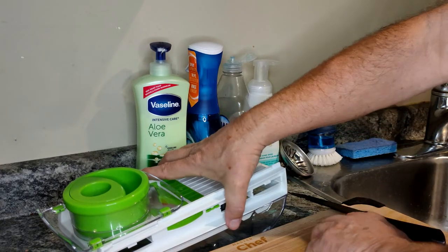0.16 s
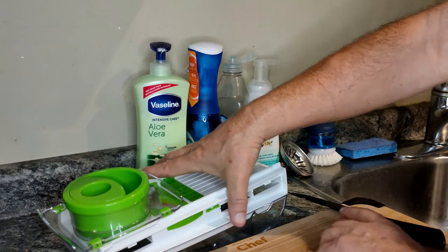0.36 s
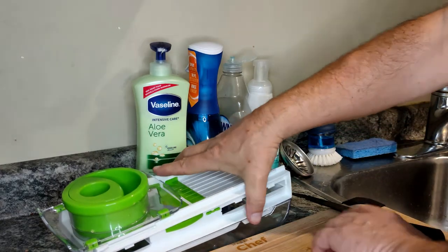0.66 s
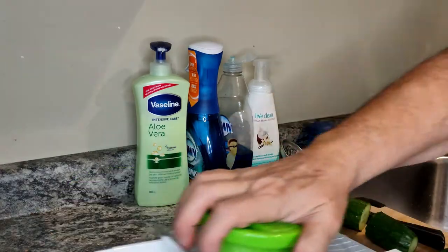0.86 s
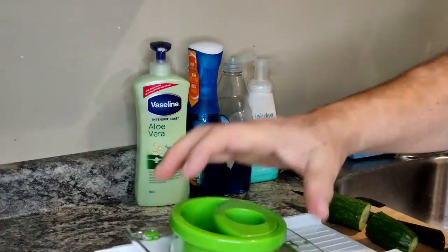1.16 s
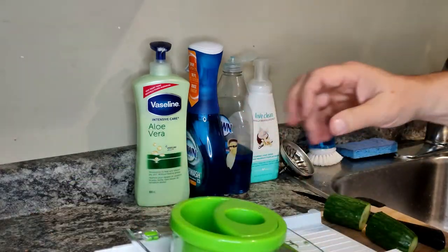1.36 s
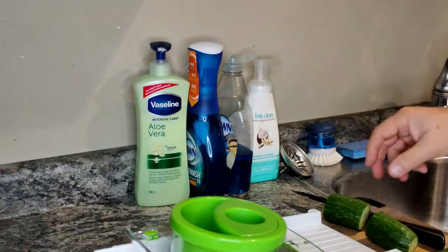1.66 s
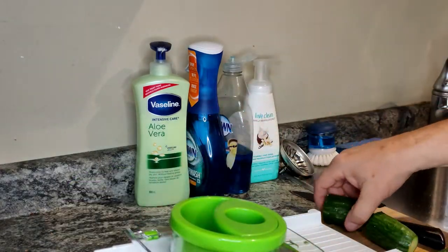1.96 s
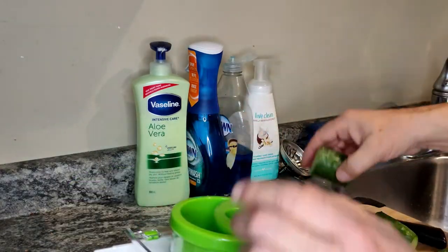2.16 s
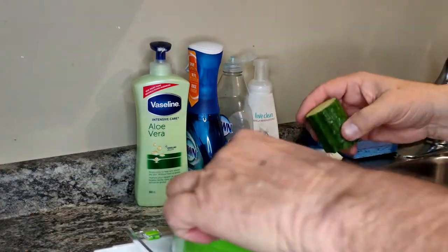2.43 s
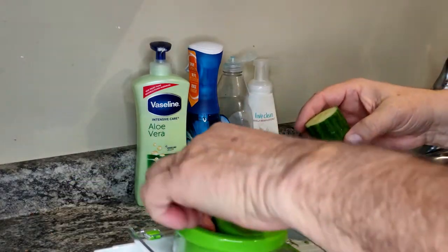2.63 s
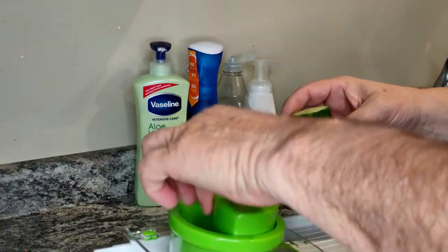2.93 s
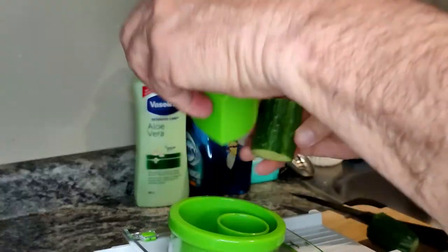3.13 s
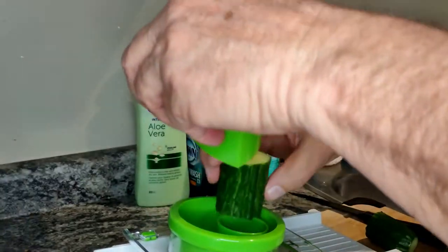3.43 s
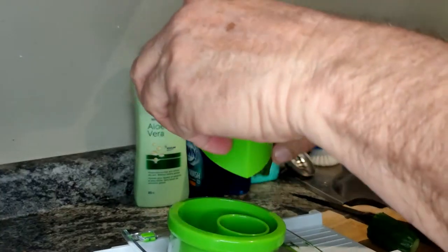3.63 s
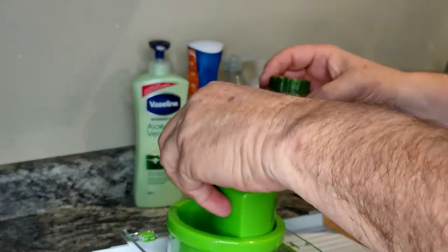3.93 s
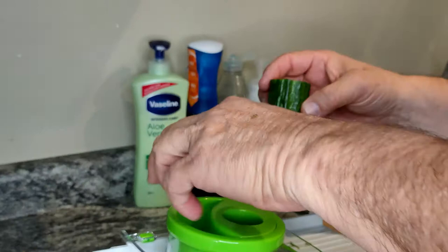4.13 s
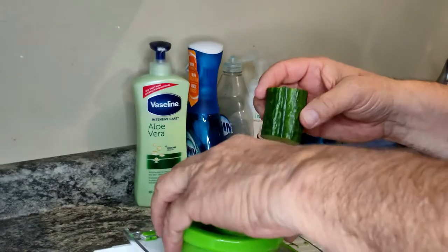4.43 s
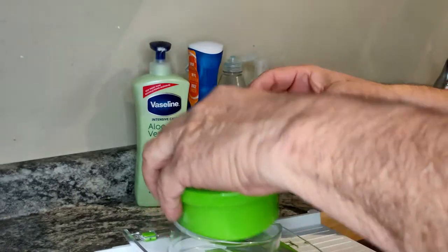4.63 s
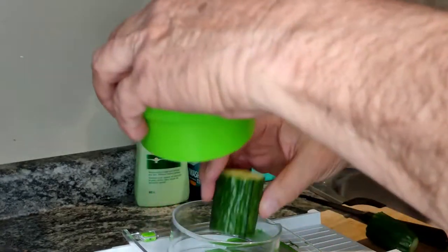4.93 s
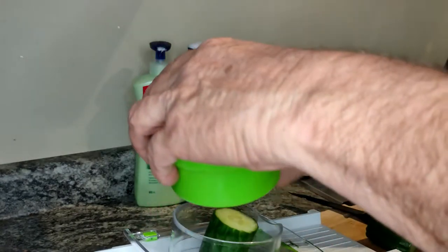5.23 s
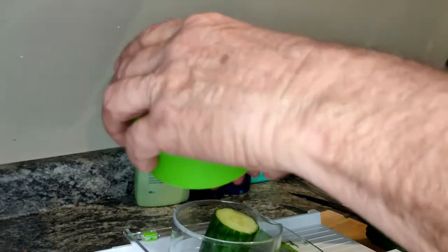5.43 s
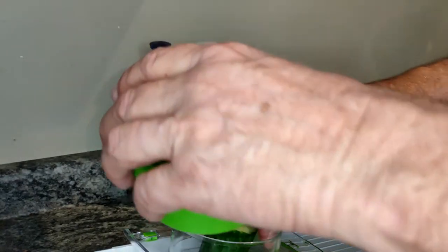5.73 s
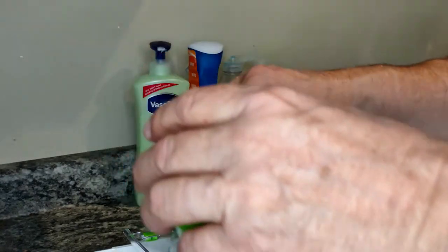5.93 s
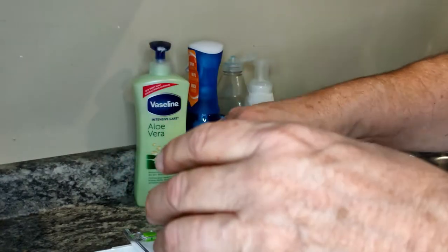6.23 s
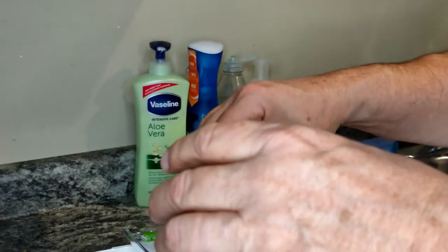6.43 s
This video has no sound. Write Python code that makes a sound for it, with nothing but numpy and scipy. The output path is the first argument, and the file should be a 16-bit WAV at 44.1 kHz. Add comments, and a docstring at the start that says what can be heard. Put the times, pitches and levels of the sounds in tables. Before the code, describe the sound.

A refrigerator hums low and steady in a small kitchen, with faint thin whines and room air. In the first half second, light plastic ticks and a soft slide are heard. From 0.7 to 1.3 seconds a hard plastic slicer is put down on a stone counter: loud hollow clacks, a very sharp crack near 1.0, dull low thuds, gritty scraping and loose rattling. Smaller hollow taps come at 1.6 to 1.95, then quiet handling and soft rubbing until 3. A bright clack hits at about 3.1 and another at 3.45. From 4.0 to 4.3 there is a dense, loud clatter of hollow plastic, with scuffs and soft counter thuds, followed by lighter knocks to 4.75. After 5.2 only airy slides and barely audible taps remain over the hum. The microphone is near, the top end dull, and brief echoes follow the blows.

```python
"""A refrigerator hums in a home kitchen under a faint slide; then hollow clacks, rattles and soft slides follow.
Hands set a plastic vegetable slicer on a stone counter, take up a cucumber and fit the holder and pusher.
Knocks and thuds are noisy pushes that ring plastic and counter modes; slides are grainy friction noise,
with loose parts that rattle. The hum is a stack of compressor orders with whines and room air.
Sparse echoes follow the blows; a near, narrow-band microphone hears everything."""
import sys
import numpy as np
from scipy import signal
from scipy.fft import rfft, irfft
from scipy.io import wavfile
from scipy.ndimage import uniform_filter1d

SR = 44100
rng = np.random.default_rng(int(sys.argv[2]) if len(sys.argv) > 2 else 0)


def wrap_up_sound(samples):
    """Save the sound to the file named by the first command line argument, as 16-bit audio."""
    columns = np.atleast_2d(samples).T
    # keep every value between -1 and 1, then stretch to whole-number steps
    tamed = np.clip(columns, -1, 1)
    steps = np.round(tamed * 32767).astype(np.int16)
    wavfile.write(sys.argv[1], SR, steps)


def convert_level_to_amplitude(level_db):
    """Map a level in decibels to its linear amplitude factor."""
    exponent = np.asarray(level_db, float) / 20
    return 10 ** exponent


N = 290178  # samples

# Levels in these tables are source levels, ahead of the microphone.
# compressor orders: multiple of the shaft rate, level_db (added to MOTOR_DB)
MOTOR_ORDERS = [(4, -16), (5, -3.5), (6, -2), (7, -8), (8, -15.5), (9, -22), (10, -25.5)]
# thin refrigerator whines: pitch_hz, level_db (rms, before slow wander)
FRIDGE_WHINES = [(215, -68), (947, -75), (2186, -78.5), (3074, -78), (4199, -68.5)]
# spectrum shape of the room air: frequency_hz, density_db (per Hz, relative)
AIR_COLOUR = [(30, -15), (150, -3.5), (220, -1.5), (450, 4), (1000, -7), (1300, -11), (2800, -16.5),
              (5000, -9.5), (6500, -3.5), (8000, -20.5)]
# spectrum shape of the handling rumble: frequency_hz, density_db (per Hz, relative)
HANDLING_COLOUR = [(20, -9.5), (45, -11), (90, -4), (160, -4.5), (300, -25.5)]
# strokes of skin and plastic: firmest_s, level_db, dullness_db (scuff over hiss), swell_s, fade_s
STROKES = [(0.0, -47, 6.5, .01, 0.11), (.104, -40, -10, 0.12, 0.12), (.14, -48.5, -11, .02, 0.73),
           (.54, -50, -18, 0.17, 0.98), (0.719, -49.5, 2.5, 0.18, 0.059), (0.831, -37, 5.5, .03, 0.21),
           (0.976, -30, -11.5, 0.083, 0.031), (1.012, -27.5, 3, .02, 0.084), (1.11, -36.5, -3, 0.063, .14),
           (1.28, -47, 2, 0.035, 0.19), (1.775, -48.5, 11.5, 0.085, 0.024), (1.85, -49.5, -1, .03, 0.37),
           (2.1, -41, -21, 0.12, .03), (2.171, -56, -5, .03, 0.27), (2.599, -52, 4, 0.063, 0.099),
           (2.79, -48, -7, 0.07, 1), (3.12, -41.5, 5.5, .03, 0.14), (3.43, -49.5, -35, 0.15, 0.031),
           (3.491, -44.5, 9.5, 0.028, 0.12), (3.66, -52, -12, 0.079, .55), (4.11, -38, -3.3, 0.033, 0.43),
           (4.29, -36.5, 4, 0.032, 0.14), (4.55, -52, 0, 0.22, 0.11), (4.7, -37, -18, 0.1, 0.24),
           (4.8, -45, -5.5, 0.017, 0.41), (5.15, -42.5, -8, .55, 0.21), (5.28, -53.5, -7, .1, 0.065),
           (5.58, -44.5, -18, 0.29, 0.39), (6.0, -57, -18, .1, 0.17), (6.267, -41.5, -14, 0.025, .04)]
# spectrum shape of the friction hiss: frequency_hz, density_db (per Hz, relative)
HISS_COLOUR = [(2000, -24.5), (3500, -15), (5000, -10.5), (6400, 3), (8000, -16.5)]
# curve that shapes the dull scuff after the slicer's modes: frequency_hz, density_db (per Hz, relative)
SCUFF_COLOUR = [(350, -17.5), (600, -12), (1300, -3.5), (2300, -0.5), (4000, -6), (6000, -26.5)]
# blows that reach the counter: start_s, level_db, favoured_pitch_hz, push_length_ms
COUNTER_BLOWS = [(0.239, -45.5, 91.5, 2.3), (0.329, -47.5, 108, 2.9), (0.601, -57, 91.5, 4.9),
                 (0.743, -27, 86.1, 4), (0.799, -30, 108, 6.6), (0.983, -30.5, 101, 6.2),
                 (1.029, -37.5, 161, 4.5), (1.206, -45, 105, 3.5), (1.256, -45.5, 86.1, 6.8),
                 (1.669, -45, 98, 6.6), (1.712, -44.5, 140.6, 3.5), (1.787, -46.5, 89.7, 4.3),
                 (2.049, -54, 80.2, 4.1), (2.112, -35.5, 118, 6.2), (2.599, -48, 151, 22),
                 (2.858, -48.5, 145, 8.5), (3.049, -38.5, 128.5, 32), (3.082, -47.5, 126.3, 4.1),
                 (3.458, -36.5, 143, 12), (4.039, -32, 122, 7.5), (4.107, -38.5, 137, 12),
                 (4.254, -36.5, 148, 13), (4.522, -45, 114, 2.1), (4.636, -44, 152, 13),
                 (4.745, -42, 132.8, 4.8), (5.169, -54.5, 152, 5.3), (5.348, -53.5, 124, 5)]
# modes of the stone counter: pitch_hz, level_db (relative)
COUNTER_MODES = [(66, -17), (92, -10.5), (115, -3.5), (141, 1), (165, 1.5), (200, -4), (240, 3.5)]
# blows on the plastic: start_s, tick_level_db, hollowness_db (low modes over the bright tick),
# favoured_pitch_hz, chatter_length_ms
PLASTIC_BLOWS = [(0.1101, -30, -11.5, 925, 5), (0.2014, -33, -19.5, 1440, 5.6),
                 (0.3304, -36.5, -3.5, 772, 2.9), (0.6035, -47, -1, 627, 3.1),
                 (0.7354, -20.5, -9, 1380, 11), (0.7417, -17.5, -9, 759, 8.1), (0.7868, -12, -4.5, 807, 11),
                 (0.7956, -8, -8, 1670, 1.9), (0.9286, -29, -2.5, 666, 7.8), (0.9823, -5.5, -22, 1814, 3.1),
                 (1.0154, -23, -14.5, 1087, 8.9), (1.0477, -30, 0, 1610, 2.7),
                 (1.1139, -26, -8.5, 1320, 4.2), (1.1762, -25, -12.5, 2390, 3.4),
                 (1.2058, -21.5, -9, 1890, 5.6), (1.2434, -26.5, -7.5, 1070, 3.7),
                 (1.2521, -17.5, -30.5, 581, 2.3), (1.6124, -50.5, 8, 1220, 5.9),
                 (1.6465, -32.5, -0.5, 1520, 3.1), (1.6688, -30.5, 2, 984, 2.2), (1.7064, -26, -1, 797, 4),
                 (1.722, -16, -14, 586, 2.3), (1.7841, -27.5, 0.5, 1520, 2.7), (1.8134, -28.5, 1, 590, 3.2),
                 (1.9296, -30.5, -29, 576, 2.1), (2.0413, -50, -3, 810, 7.1), (2.1084, -40, 17, 777, 5.9),
                 (2.1534, -61.5, 29.5, 725, 5.6), (2.2383, -54, -5, 675, 2.3), (2.3276, -53, -25, 703, 3.3),
                 (2.5865, -45.5, -1, 1620, 6.5), (2.6615, -34, -6, 1700, 9.8), (2.7985, -60, 18, 620, 2.7),
                 (2.861, -38, -4.5, 1180, 4.3), (3.0235, -38.5, -8, 1850, 13),
                 (3.0476, -18.5, -0.5, 579, 8), (3.0822, -8.5, -25.5, 1630, 2.9),
                 (3.1083, -27, 0.5, 573, 1.7), (3.4552, -13, -9, 2450, 5.8), (3.5119, -29.5, -9, 586, 5),
                 (4.0041, -14.5, -8.5, 2170, 5), (4.0297, -7.5, -10.5, 788, 4.2),
                 (4.0474, -14, -4.5, 1012, 5), (4.0755, -25.5, -13, 1874, 5), (4.1016, -21.5, -3, 774, 11),
                 (4.1719, -33, -14, 793, 6.1), (4.2162, -26, -8, 634, 14), (4.2497, -12, -10, 1777, 6.8),
                 (4.2615, -8.5, -10, 770, 3), (4.2894, -29.5, 0, 585, 3.9), (4.4468, -26, -37, 1490, 4.1),
                 (4.52, -24, -10, 2100, 2.2), (4.6209, -42, 0, 585, 5.4), (4.6364, -34.5, 4.5, 634, 3.9),
                 (4.6616, -34, 3, 622, 6.6), (4.7451, -23.5, -2.5, 591, 8.1),
                 (5.1651, -38.5, -14.5, 617, 5.3), (5.8876, -51.5, 5.5, 956, 4),
                 (5.9534, -52, 0.5, 604, 3.5), (6.5234, -59.5, 5, 530, 5.4)]
# modes of the plastic slicer: pitch_hz, level_db (relative)
SLICER_MODES = [(587, -1), (705, -2), (830, 0), (965, 0), (1060, 0.5), (1240, 2.5), (1440, 2), (1600, -1.5),
                (1730, -3.5), (1850, -1.5), (2090, 0), (2270, -1.5), (2540, 0.5), (2950, -1), (3240, 3),
                (3750, 3), (4100, -12), (4700, -7.5), (5300, -7), (5600, -7.5), (6200, 1), (6550, 3),
                (6950, 3), (7300, -17)]
# decay of the kitchen's echoes: frequency_hz, t60_s
KITCHEN_DECAY = [(100, 0.38), (300, 0.94), (700, 0.38), (2000, 0.42), (5000, 0.42), (8000, 0.36)]
# response of the narrow-band microphone: frequency_hz, gain_db
MICROPHONE_RESPONSE = [(20, -13.5), (60, 2), (5000, -8.5), (7000, -10.5), (7500, -5), (8000, -14),
                       (8400, -24.5), (8800, -76), (12000, -79.5)]

MOTOR_HZ, MOTOR_DB, AIR_DB = 59.2, -53.5, -55.5
# hands lean on the counter around every thud: level at a thud of -38 dB, share of its strength, swell, fade, floor
RUMBLE_DB, RUMBLE_SHARE, RUMBLE_SWELL_S, RUMBLE_FADE_S, RUMBLE_REST_DB = -55.5, 0.61, 0.25, 0.25, -71.5
STROKE_RANGE_DB = 20  # how far a contact rises in its swell time and falls in its fade time
CATCHES_PER_S = 590
RATTLES_PER_S, RATTLE_DB, RATTLE_SPREAD_DB = 70, -6.5, 7
RATTLE_LAW = 2.4  # rattle dB per stroke dB: only firm strokes shake parts loose
COUNTER_LOSS, PLASTIC_LOSS = 0.37, 0.05  # mode width over pitch, at the mean pitch of the modes struck
HOLLOW_TOP_HZ, CLACK_TOP_HZ, BODY_LOW_HZ = 1500, 4000, 480
CLACK_DB, CLACK_SHARE = -1.5, 0.4  # the middle modes take a share of the hollowness
FAVOUR_DB = 10  # lift of the plastic modes at the favoured pitch
KITCHEN_DB = -10.5


def evened(x):
    """Scales to rms 1."""
    return x / np.sqrt(np.mean(x ** 2) + 1e-20)


def read(points, hz):
    """Reads a curve on a log-frequency axis."""
    f, value = np.transpose(points)
    return np.interp(np.log(hz + 1), np.log(f + 1), value)


def coloured(x, points):
    """Multiplies the spectrum of x by the dB curve of points."""
    gain = convert_level_to_amplitude(read(points, np.fft.rfftfreq(len(x), 1 / SR)))
    return irfft(rfft(x) * gain, len(x))


def wander(rate_hz):
    """Slow random drift of rms 1: noise through a one-pole lowpass."""
    pole = np.exp(-2 * np.pi * rate_hz / SR)
    return evened(signal.lfilter([1], [1, -pole], rng.standard_normal(N)))


def tents(s, db, swell_s, fade_s):
    """Sums the power of contacts that swell up to their moment and fade after it, straight in dB."""
    t = np.arange(0, N + 64, 64)[:, None] / SR - s
    distance = np.maximum(-t / np.maximum(swell_s, .005), t / np.maximum(fade_s, .005))
    power = convert_level_to_amplitude(2 * (db - STROKE_RANGE_DB * distance)).sum(1)
    return np.interp(np.arange(N), np.arange(len(t)) * 64, np.sqrt(power))


def ring(push, modes, loss, lift_db):
    """A push sounds damped modes, the lowest relatively narrower; the loudest 10 ms have rms 1."""
    hz, db = np.transpose(modes)[:, :, None]
    t = np.arange(len(push)) / SR
    loss = loss * (hz / hz.mean()) ** .4
    sign = (-1) ** np.arange(len(modes))[:, None]  # neighbours in opposite phase
    strength = sign * convert_level_to_amplitude(db + lift_db[:, None])
    body = (strength * np.exp(-np.pi * loss * hz * t) * np.sin(2 * np.pi * hz * t)).sum(0)
    sound = signal.fftconvolve(push, body)[:len(push)]
    return sound / np.sqrt(uniform_filter1d(sound ** 2, size=SR // 100).max())


def refrigerator():
    """Compressor orders throb together at the shaft rate; thin whines and room air lie over them."""
    t = np.arange(N) / SR

    def tone(hz, db, phase):
        """A sine whose level wanders slowly."""
        drift_db = 1.8 * uniform_filter1d(wander(rate_hz=9), size=2000)
        return np.sqrt(2) * convert_level_to_amplitude(db + drift_db) * np.cos(2 * np.pi * hz * t + phase)

    hum = sum(tone(k * MOTOR_HZ, MOTOR_DB + db, .3 * k * k) for k, db in MOTOR_ORDERS)
    whines = sum(tone(hz, db, 0) for hz, db in FRIDGE_WHINES)
    air = convert_level_to_amplitude(AIR_DB) * evened(coloured(rng.standard_normal(N), AIR_COLOUR))
    return hum + whines + air


def handling_rumble():
    """Hands leaning on the counter make low noise that swells around every thud."""
    s, thud_db = np.transpose(COUNTER_BLOWS)[:2]
    lean_db = RUMBLE_DB + RUMBLE_SHARE * (thud_db + 38)
    lean = tents(s, lean_db, RUMBLE_SWELL_S, RUMBLE_FADE_S) + convert_level_to_amplitude(RUMBLE_REST_DB)
    return lean * evened(coloured(rng.standard_normal(N), HANDLING_COLOUR))


def slicer_body():
    """The slicer's answer to a single impulse."""
    return ring(signal.unit_impulse(4096), SLICER_MODES, PLASTIC_LOSS, np.zeros(len(SLICER_MODES)))


def slides():
    """Friction is fine noise with sparse catches; its dull part sounds through the slicer's modes."""
    s, db, dull_db, swell_s, fade_s = np.transpose(STROKES)
    catches = (rng.random(N) < CATCHES_PER_S / SR) * rng.standard_normal(N) * 5
    unsteady = convert_level_to_amplitude(1.7 * uniform_filter1d(wander(rate_hz=10), size=100))
    grains = (rng.standard_normal((2, N)) + catches) * unsteady
    hiss = evened(coloured(grains[0], HISS_COLOUR))
    through_body = signal.oaconvolve(grains[1], slicer_body())[:N]
    scuff = evened(coloured(through_body, SCUFF_COLOUR))
    return tents(s, db, swell_s, fade_s) * hiss + tents(s, db + dull_db, swell_s, fade_s) * scuff


def rattles():
    """Loose parts tap at random while they are moved, and ring the slicer's modes."""
    s, db, _, swell_s, fade_s = np.transpose(STROKES)
    strength = convert_level_to_amplitude(RATTLE_SPREAD_DB * np.minimum(rng.exponential(1, N), 4))
    taps = (rng.random(N) < RATTLES_PER_S / SR) * strength
    bursts = np.convolve(taps, np.exp(-np.arange(200) / 40), "full")[:N]
    chatter = bursts * rng.standard_normal(N)  # each tap is about a ms of chatter
    shaking = tents(s, RATTLE_LAW * (db + 35) - 39, swell_s, fade_s)
    return convert_level_to_amplitude(RATTLE_DB) * shaking * evened(signal.oaconvolve(chatter, slicer_body())[:N])


def thuds():
    """A soft noisy push of a few ms shakes the counter's modes, most near its favoured pitch."""
    out, t = np.zeros(N + SR), np.arange(16384) / SR
    hz = np.array(COUNTER_MODES)[:, 0]
    for s, db, centre_hz, ms in COUNTER_BLOWS:
        push = rng.standard_normal(len(t)) * t * np.exp(-t * 1000 / max(ms, 1))
        lift_db = 12 * np.exp(-(np.log(hz / centre_hz) / 0.32) ** 2)
        out[round(s * SR):][:len(t)] += convert_level_to_amplitude(db) * ring(push, COUNTER_MODES, COUNTER_LOSS, lift_db)
    return signal.sosfilt(signal.butter(2, 45, "high", fs=SR, output="sos"), out[:N])


def knock_push(t, ms):
    """A short chatter: a first touch, uneven contacts that die away, and rebounds of loose parts."""
    fade = (1 - np.exp(-t / 0.003)) * np.exp(-(t * 1000 / max(ms, .5)) ** 0.81)
    rebounds = uniform_filter1d(rng.random(len(t)) < 150 / SR, size=80, output=float) * 80
    fade = fade + 0.13 * (.5 + rebounds) * np.exp(-t * 1000 / (3.7 * ms + 8))  # loose parts settle
    contacts = rng.standard_normal(len(t))
    push = contacts * abs(contacts) ** 0.14 * fade  # a few contacts stand out
    push[4:16] += 0.5 * np.hanning(12)  # a blunt shove starts the low modes at once
    push[8] += 13.0 / (ms + 1)  # short blows start with a crack, long ones scrape in
    return push


def knocks():
    """Chattering blows ring the plastic; favoured pitch and chance set which modes speak, slightly detuned."""
    out, t = np.zeros(N + SR), np.arange(8192) / SR
    modes = np.array(SLICER_MODES, float)
    hz = modes[:, 0]
    hollow, tick = hz < HOLLOW_TOP_HZ, hz >= CLACK_TOP_HZ
    clack = ~hollow & ~tick
    for s, tick_db, hollow_db, centre_hz, ms in PLASTIC_BLOWS:
        push = knock_push(t, ms)
        level_luck, pitch_luck = rng.standard_normal((2, len(hz)))
        lift_db = 1.5 * level_luck + FAVOUR_DB * np.exp(-(np.log(hz / centre_hz) / 0.098) ** 2)
        detune = 1 + .004 * np.log2(hz / 400) * pitch_luck
        detuned = modes * np.c_[detune, np.ones(len(hz))]
        clack_db = tick_db + CLACK_DB + CLACK_SHARE * hollow_db
        for db, pick in ((clack_db, clack), (tick_db + hollow_db, hollow), (tick_db, tick)):
            out[round(s * SR):][:len(t)] += convert_level_to_amplitude(db) * ring(push, detuned[pick], PLASTIC_LOSS, lift_db[pick])
    # the slicer is too small to radiate bass
    return signal.sosfilt(signal.butter(3, BODY_LOW_HZ, "high", fs=SR, output="sos"), out[:N])


def kitchen(x):
    """Sparse echoes of random sign, each band dying at its own speed; three patterns crossfade steadily."""
    out = np.zeros(N)
    turn = 2 * np.pi * 1.7 * np.arange(N) / SR  # crossfade at 1.7 Hz
    at = np.arange(150, SR - 20, 20)  # one echo in every 20 samples
    for k in range(3):
        echoes = np.zeros(SR)
        echoes[at + rng.integers(0, 20, len(at))] = rng.choice([-1., 1.], len(at))
        hz, t, z = signal.stft(echoes, SR, nperseg=256)
        decay = convert_level_to_amplitude(-60 * t / read(KITCHEN_DECAY, hz)[:, None])
        tail = signal.istft(z * decay, SR, nperseg=256)[1]
        share = np.sqrt(2 / 3) * np.cos(turn + k * np.pi / 3)  # the three powers sum to 1
        out += signal.fftconvolve(x * share, tail / np.linalg.norm(tail))[:N]
    return out


def scene():
    """The refrigerator, handling and slides lie under knocks and thuds with their echo."""
    background = refrigerator() + handling_rumble()
    strokes = slides() + rattles()
    blows = thuds() + knocks()
    return (background + strokes + blows + convert_level_to_amplitude(KITCHEN_DB) * kitchen(blows))[None]


def top_cut(x):
    """Nothing passes above the cut-off."""
    return signal.sosfilt(signal.butter(12, 8500, fs=SR, output="sos"), x)


def record(dry):
    """The microphone's narrow band, then a preamplifier that rounds off the loudest peaks."""
    heard = coloured(dry[0], MICROPHONE_RESPONSE)
    ceiling = 0.95  # of full scale
    finished = ceiling * np.tanh(heard / ceiling)[None]
    return top_cut(finished)


dry = scene()
out = record(dry)
wrap_up_sound(out)
```